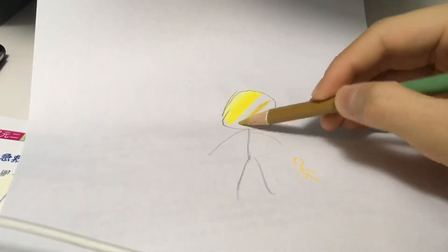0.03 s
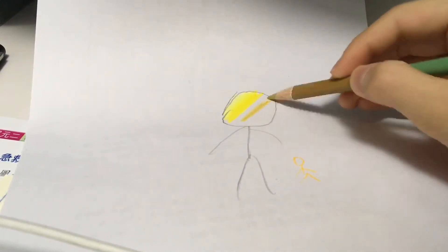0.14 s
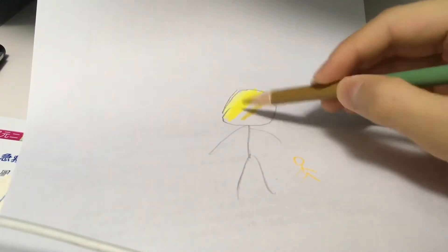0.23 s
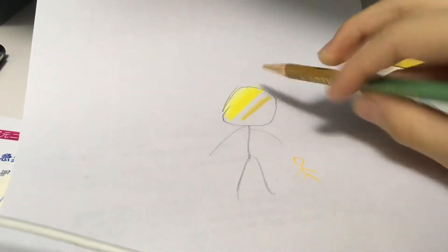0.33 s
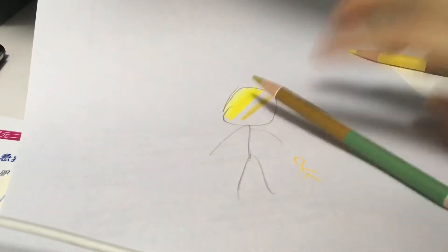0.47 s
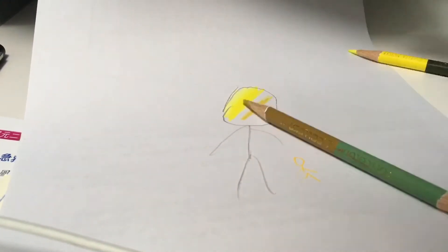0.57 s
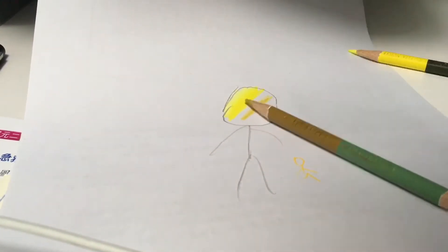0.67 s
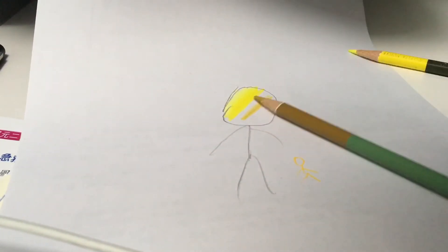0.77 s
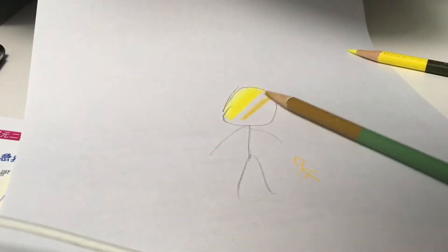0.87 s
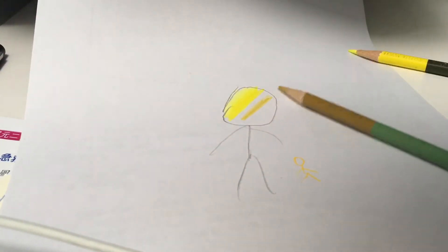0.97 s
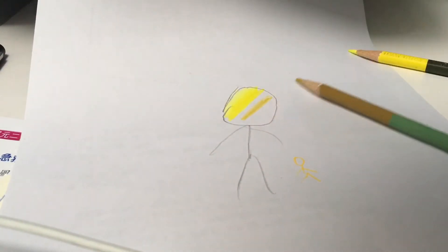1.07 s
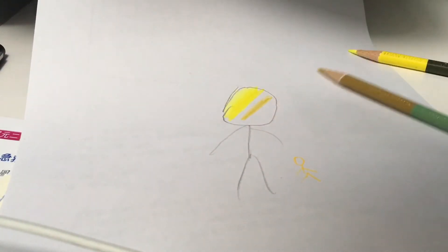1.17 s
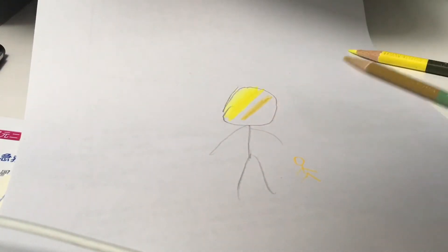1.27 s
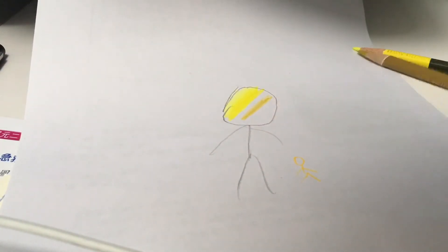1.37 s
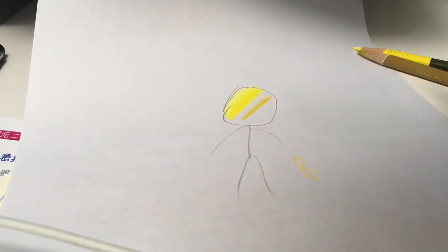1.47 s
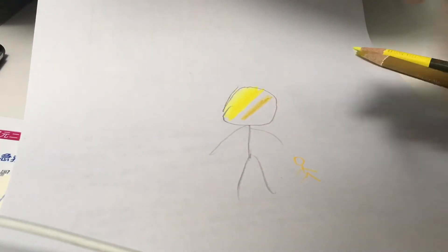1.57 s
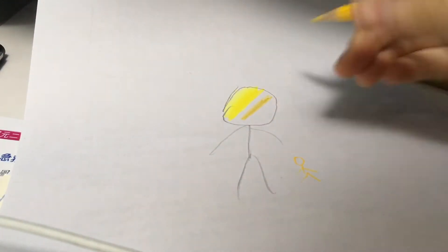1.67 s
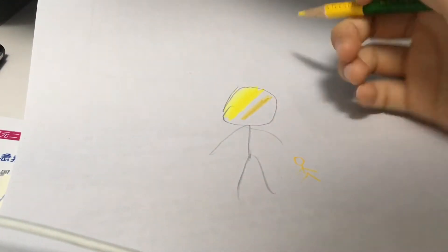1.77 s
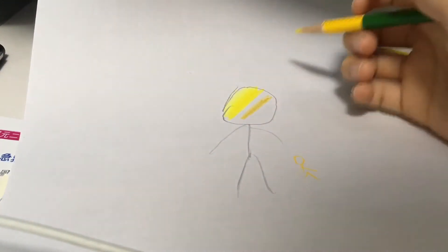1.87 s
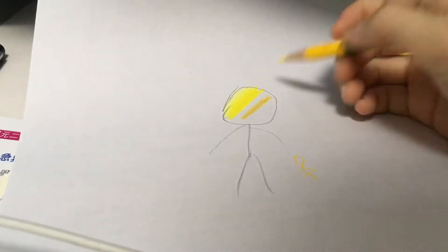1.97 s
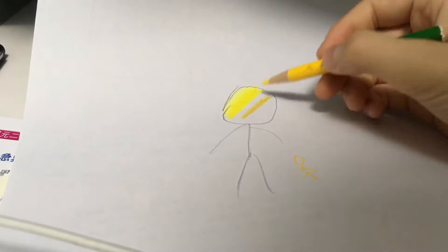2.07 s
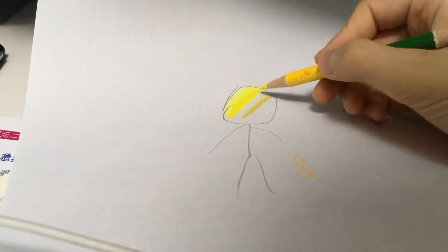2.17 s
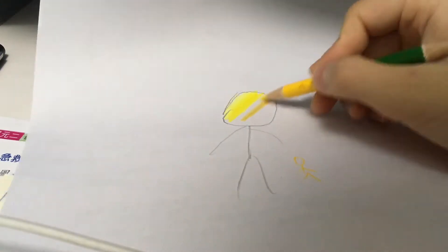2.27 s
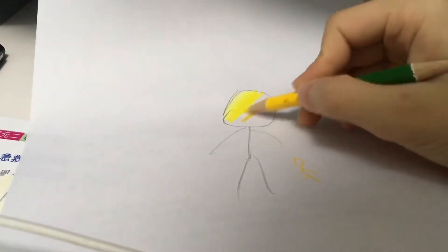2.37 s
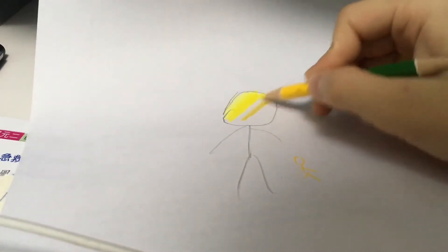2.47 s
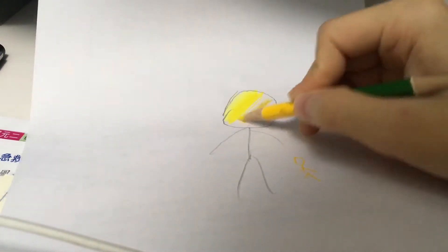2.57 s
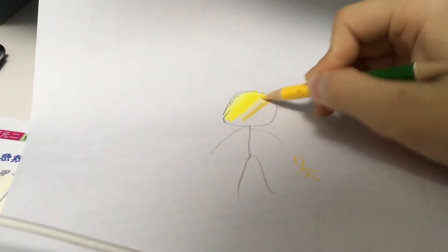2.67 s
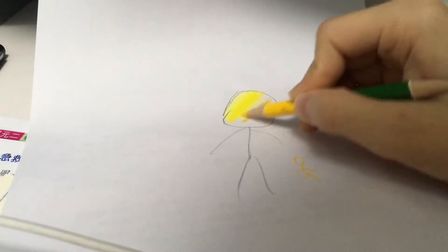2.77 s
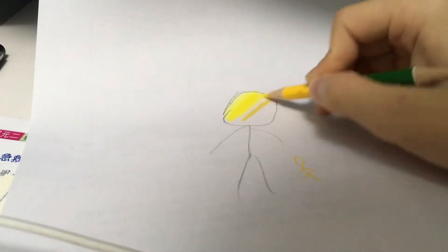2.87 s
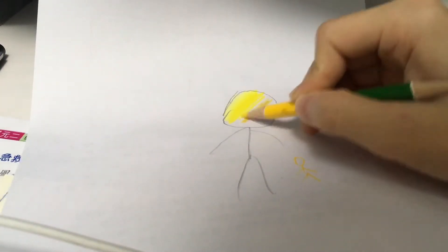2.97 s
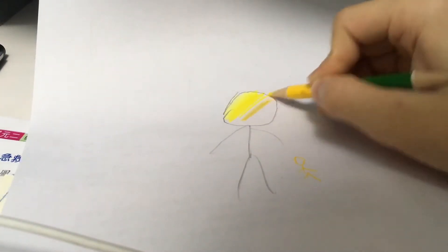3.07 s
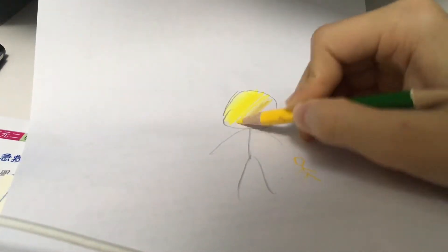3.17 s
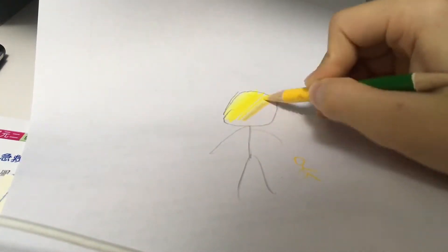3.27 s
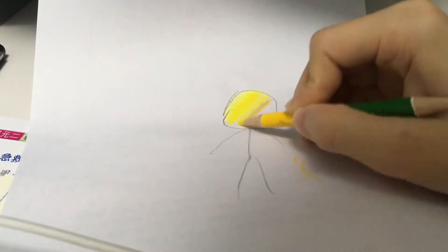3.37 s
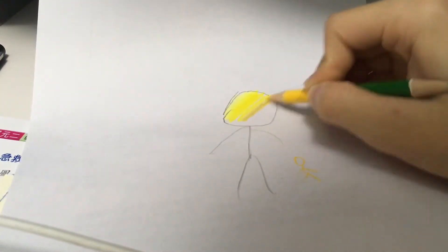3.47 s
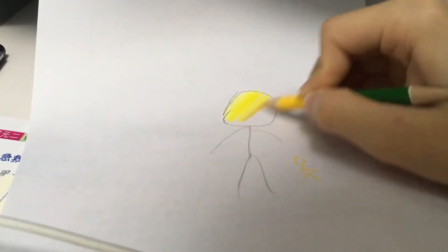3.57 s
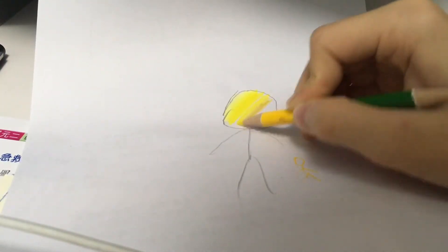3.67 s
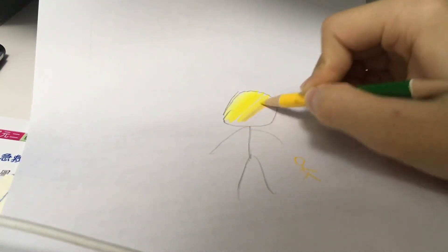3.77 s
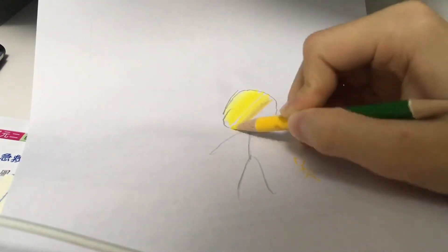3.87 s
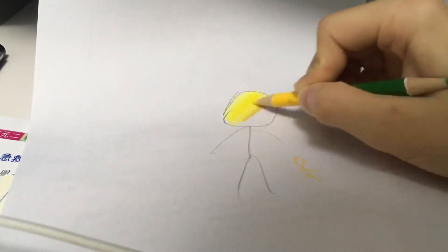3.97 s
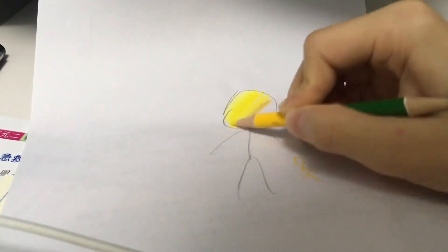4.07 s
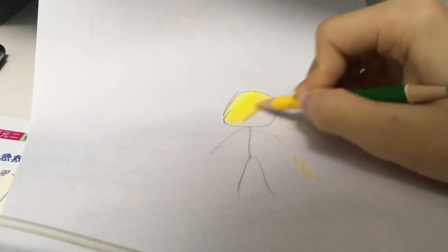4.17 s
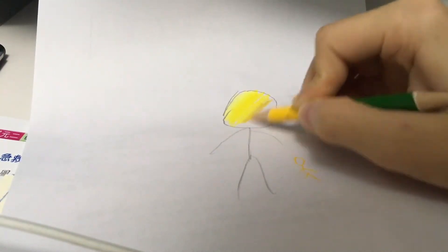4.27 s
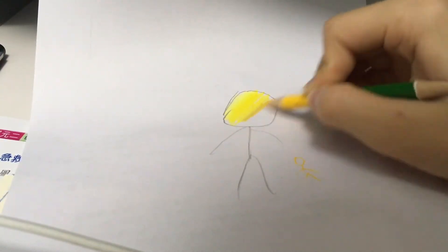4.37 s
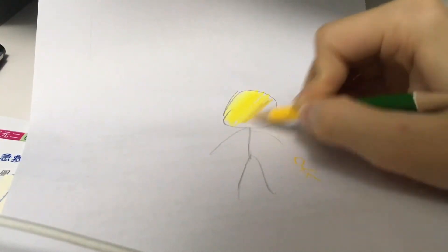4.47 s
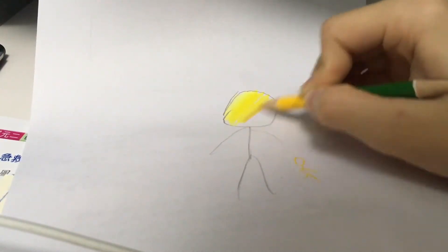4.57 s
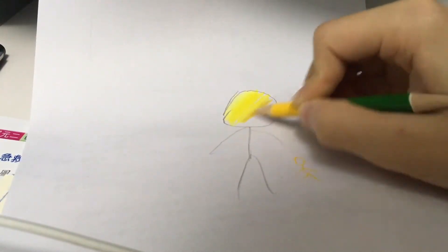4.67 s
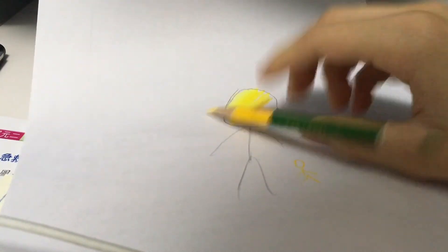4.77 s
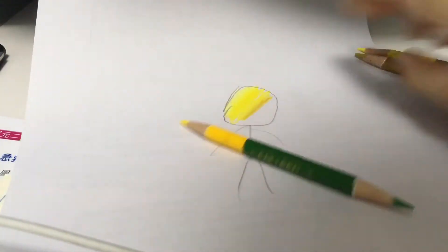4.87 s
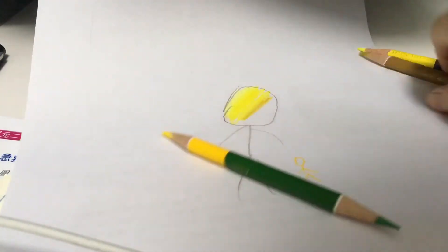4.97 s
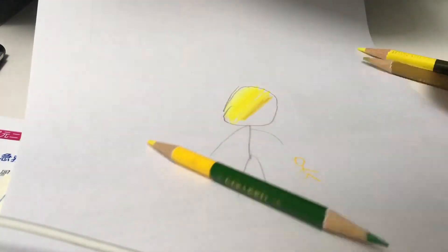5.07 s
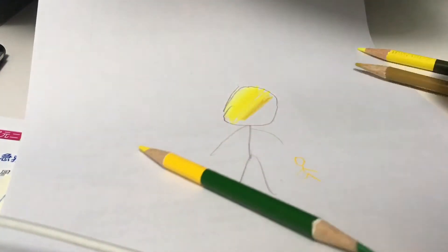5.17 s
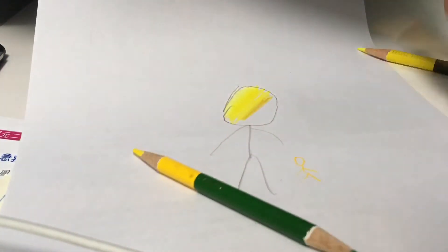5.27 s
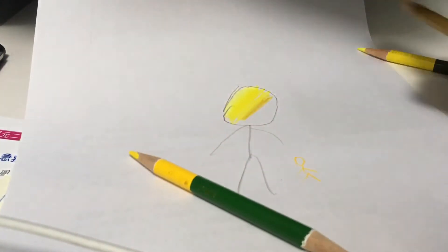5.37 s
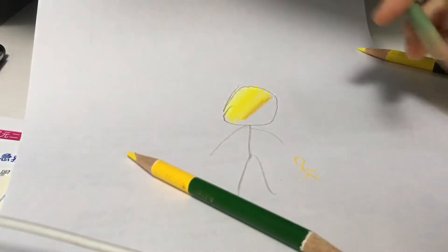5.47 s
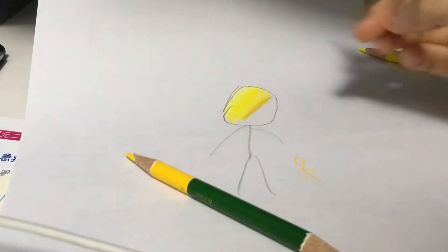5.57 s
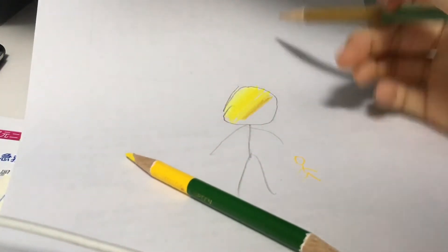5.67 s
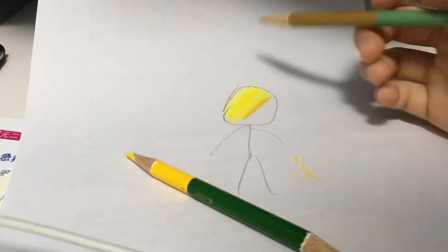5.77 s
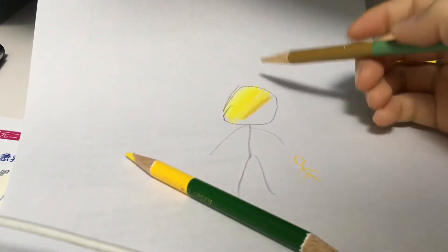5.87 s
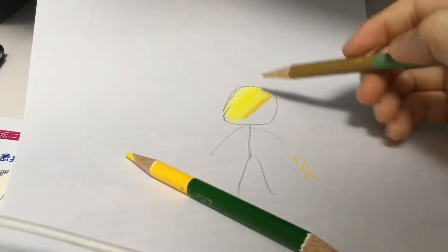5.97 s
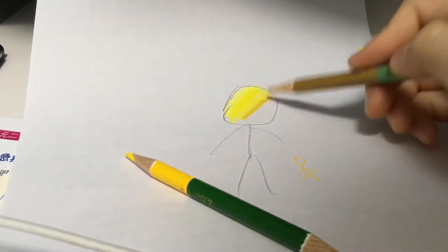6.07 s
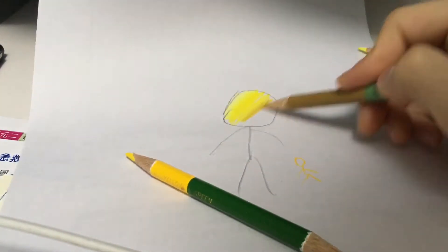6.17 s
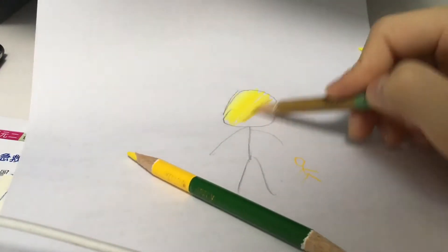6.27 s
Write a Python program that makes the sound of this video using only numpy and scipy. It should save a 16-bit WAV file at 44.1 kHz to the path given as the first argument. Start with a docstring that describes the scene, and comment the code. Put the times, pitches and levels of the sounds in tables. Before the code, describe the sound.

Close to the microphone in a small room, a colored pencil briefly scratches on paper. Pencils then tap, drop onto the desk, clack together and rattle while a hand brushes the sheet. Quick back-and-forth shading follows for a couple of seconds. Another pencil drops and rattles, there is soft rustling, and the shading starts again at the very end. A low ventilation hum runs underneath.

```python
"""A desk in a small room, a phone's microphone close to a sheet of paper, a low ventilation hum behind.
A coloured pencil ends a spell of shading and a hand brushes the sheet; pencils knock down on the desk,
the loudest drop in a short rasp of noise, then clack together and rattle. From 2.25 s the lead shades
back and forth, catching on the paper's tooth in quick strokes. At 4.8 s come more taps, a drop, rattling
and brushing, then one soft scuff. The shading starts again just after 6 s."""
import sys
import numpy as np
from scipy import signal
from scipy.fft import rfft, irfft
from scipy.io import wavfile
from scipy.ndimage import uniform_filter1d

SR = 44100
rng = np.random.default_rng(int(sys.argv[2]) if len(sys.argv) > 2 else 0)


def unload_audio(sound):
    """Save the sound as a 16-bit wav file, at the path given as the first command line argument."""
    columns = np.transpose(np.atleast_2d(sound))
    # keep every value between -1 and 1, then stretch to whole-number steps
    steps = np.round(np.clip(columns, -1, 1) * 32767)
    wavfile.write(sys.argv[1], SR, steps.astype(np.int16))


N = 278922
TIME = np.arange(N) / SR

# room tone, the spectra of ventilation and air: (frequency [Hz], relative level [dB])
HUM_SPECTRUM = [(20, -30.5), (38, -36), (52, -6), (85, -9), (102, -2.5), (165, 0), (215, -2), (234, -10),
                (285, -3), (305, -20.5), (450, -27), (800, -41.5), (2000, -61.5)]
AIR_SPECTRUM = [(200, -2), (500, 4.5), (950, 5.5), (1300, 7), (2250, -0.5), (2600, -2.5), (3300, -4.5),
                (6500, -9), (9000, -6.5), (12000, -12), (15500, -29)]

# the row at 0.742 s is a short rasp of noise around the loud drop; in the others, hand and pencil
# brush over the sheet: (start [s], end [s], rasp [dB], hiss [dB])
RUSTLES = [(.255, .36, -67, -70), (.355, .44, -64.5, -58.5), (.56, .76, -85, -76.5), (.742, .785, -55, -68),
           (.978, 1.034, -53, -64), (1.05, 1.11, -59, -66), (1.115, 1.165, -60.5, -71),
           (1.44, 1.72, -86, -80.5), (1.77, 1.85, -69.5, -70.5), (1.85, 1.96, -72.5, -67.5),
           (4.79, 4.858, -61, -64.5), (4.95, 5.015, -52.5, -68.5), (5.055, 5.135, -55, -75),
           (5.215, 5.245, -71, -80), (5.48, 5.64, -93.5, -78.5), (5.635, 5.667, -61.5, -64.5),
           (5.68, 5.75, -64.5, -68), (5.73, 5.9, -73, -72)]
# a pencil rattles as it rolls and settles: (start [s], end [s], level [dB])
ROLLS = [(1.214, 1.304, -48.5), (1.308, 1.444, -51), (4.929, 4.978, -50.5), (4.962, 4.995, -51),
         (5.055, 5.193, -65.5)]

# modes of a wooden pencil lying on the desk: (frequency [Hz], relative level [dB], t60 [s])
PENCIL_MODES = [(245.3, 0.5, 0.14), (418, -7.5, 0.09), (506, -0.5, 0.039), (715, -5, 0.076),
                (1024, -4, 0.04), (1132, -4, 0.036), (1353, 2, 0.021), (1673, -1.5, 0.044),
                (1779, -7, 0.055), (1963, -2.5, 0.057), (2136, -2.5, 0.037), (2413, -0.5, 0.037),
                (2875, -9, 0.032), (3190, -9.5, 0.042), (3930, -13, 0.031), (4410, -10, 0.04),
                (5060, -14, 0.024), (5690, -10.5, 0.039), (6720, -11.5, 0.026), (7990, -6, 0.025),
                (9500, -18.5, 0.022)]
# blows: (time [s], level [dB], brightness [dB/octave], pitch [ratio], strike point [wavelengths])
BARREL_DROPS = [(0.008, -47, 0, 1.07, 0.56), (0.602, -47.5, -7.5, 0.89, 1.07), (0.757, -33, 2, 1.027, 1.06),
                (0.898, -34, -0.56, 1.003, 1.02), (1.07, -43, -1.5, 0.98, 0.94),
                (4.9165, -35, 1.84, 0.95, 0.87)]  # on the desk
PENCIL_CLACKS = [(1.158, -37.5, -0.21, 0.99, 1.9), (1.218, -32.5, 0.87, 0.99, 1.04),
                 (1.268, -53, -2.4, 1.07, 0.63), (1.286, -45.5, -2.1, 1.04, 0.78),
                 (1.303, -54, -4.2, 0.86, 0.45), (1.324, -43.5, -0.37, 1, 0.22),
                 (1.335, -50, 2.5, 1.1, 0.68)]  # against another pencil
TIP_TAPS = [(0.16, -59.5, -1.5, 0.93, 0.31), (0.382, -61.5, -2, 0.82, 0.44), (0.408, -59, 2, 1, 0.5),
            (0.428, -37.5, 0.6, 1.064, 0.43), (0.517, -48, -3, 0.89, 0.4), (0.527, -54.5, 1.5, 0.95, 0.76),
            (2.22, -58.5, -1.5, 0.98, 0.35), (4.781, -40.5, 1.9, 1.02, 0.762),
            (5.069, -48.5, 0.5, 1.1, 1.03), (5.397, -80, 6, 1.02, 0.45), (6.077, -61.5, 0.5, 1, 0.38)]  # on the sheet
# registers of a blow, from thud to tick: (low edge [Hz], high edge [Hz])
REGISTERS = [(120, 370), (370, 880), (950, 3300), (3500, 11500)]
# offsets to the level for each kind of blow: (thud [dB], knock [dB], clack [dB], tick [dB])
DROP_BALANCE = [0.5, -5, -15, -28]
CLACK_BALANCE = [-16, -13, 0, -16.5]
TAP_BALANCE = [-2.5, -8.5, 0.5, -6]

# the rubbed sheet, heard close up: (frequency [Hz], relative level [dB])
PAPER_SPECTRUM = [(100, -15), (250, 12.5), (320, 6.5), (600, -7.5), (820, 0), (1200, -6.5), (1800, -5),
                  (2400, -11.5), (2700, -8), (3100, -12), (3900, -19.5), (9000, -15.5), (13000, -18.5),
                  (16000, -27.5)]
# resonances and notches of lead, sheet and desk: (frequency [Hz], width [Hz], lift [dB])
PAPER_RESONANCES = [(1730, 260, 3.5), (2322, 150, 12.5), (2666, 120, -23), (3230, 230, 4.5), (4740, 530, 5),
                    (5750, 450, -6.5), (6400, 440, 8.5), (7500, 290, -2), (7720, 390, 4.5), (9470, 650, 1),
                    (11500, 710, 5)]
# spells of shading: (start [s], end [s])
SHADING_SPELLS = [(-0.055, 0.153), (2.252, 4.706), (6.109, 6.325)]
# pace of the wrist: (time [s], tempo [strokes/s])
WRIST_TEMPO = [(0, 9.7), (2.25, 9.475), (2.85, 9.92), (3.65, 8.566), (4.2, 9.433), (4.45, 10.056),
               (4.7, 8.79), (6.1, 9.25)]
# weight of the hand on the lead: (time [s], relative level [dB])
HAND_WEIGHT = [(0.1, 0.1), (2.3, 0), (2.41, -1), (2.51, 0.6), (2.75, -2), (3.1, 0.9), (3.88, -2),
               (4.02, -2), (4.13, -5), (4.24, -5.5), (4.34, 0.5), (4.54, 0.5), (4.65, -2), (6.2, -0.5)]
# extra sheen on the lead's fine hiss: (time [s], relative level [dB])
HISS_SHEEN = [(0.05, -2.5), (2.3, 0), (2.41, -3.5), (2.53, 1.6), (3.0, -1.1), (3.13, 1.2), (3.6, -0.9),
              (4.15, 2), (4.5, -1), (6.2, -2.5)]
# short separate flicks of the lead: (start [s], end [s], rasp gain [dB], hiss gain [dB])
LEAD_FLICKS = [(0.153, 0.212, -61, -64.5), (4.699, 4.759, -52.5, -54.5), (4.744, 4.796, -52.5, -51.5)]


def undb(db):
    """Decibels to gain."""
    return 10 ** (np.asarray(db) / 20)


def unit(x):
    """Scale to rms 1."""
    return x / np.sqrt(np.mean(x ** 2) + 1e-20)


def decay(t, t60):
    """Fall by 60 dB in t60 seconds."""
    return np.exp(-np.log(1000) * t / t60)


def band(x, lo_hz, hi_hz, order=3):
    """Causal band-pass."""
    sos = signal.butter(order, [lo_hz, min(hi_hz, SR / 2 - 1)], "band", fs=SR, output="sos")
    return signal.sosfilt(sos, x)


def colour(x, spectrum, resonances=()):
    """Filter by a smooth spectrum (frequency [Hz], level [dB]) with resonances on it; rms 1."""
    f = np.fft.rfftfreq(len(x), 1 / SR) + 1
    hz, db = np.transpose(spectrum)
    curve_db = np.interp(np.log(f), np.log(hz), db)
    for centre, width, lift in resonances:
        curve_db += lift / (1 + (2 * (f - centre) / width) ** 2)
    return unit(irfft(rfft(x) * undb(curve_db), len(x)))


def wander(rate):
    """Smooth random drift through rate values a second; rms 1."""
    hold = max(int(SR / rate), 2)
    steps = np.repeat(rng.standard_normal(N // hold + 1), hold)
    return unit(uniform_filter1d(steps, hold)[:N])


def ventilation():
    """The bed of the room: a steady low rumble with a few weak tones, under faint air hiss."""
    hum = undb(-50) * colour(rng.standard_normal(N), HUM_SPECTRUM)
    for hz, db in [(86, -66.5), (133, -61.5), (172, -63), (205, -60.5)]:
        drifting_hz = hz + .5 * wander(rate=2.82)
        hum += undb(db) * np.sin(2 * np.pi * np.cumsum(drifting_hz) / SR)
    return hum + undb(-74.5) * colour(rng.standard_normal(N), AIR_SPECTRUM)


def room(x, wet_db=-21, t60=0.24):
    """The small furnished room leaves a short, dull tail well below the close, direct sound."""
    t = TIME[:SR // 2]
    tail = band(rng.standard_normal(len(t)), 810, 6500, order=1) * decay(t, t60) * (t > .004)
    return x + undb(wet_db) * signal.fftconvolve(x, tail / np.linalg.norm(tail))[:N]


def catches(rate, spread_db):
    """Random tiny slips of uneven size, rate per second."""
    slips = (rng.random(N) < rate / SR) * rng.standard_normal(N)
    return unit(slips * undb(spread_db * rng.standard_normal(N)))


def sheet(x, t60, ring_db):
    """The sheet's many close modes let each slip ring on for a moment."""
    t = TIME[:SR // 10]
    ring = rng.standard_normal(len(t)) * decay(t, t60)
    return x + undb(ring_db) * signal.fftconvolve(x, ring / np.linalg.norm(ring))[:N]


def roam(x, depth_db, rate, regions):
    """As the contact moves over the sheet, each region of the spectrum swells and fades on its own."""
    log_hz = np.log(np.fft.rfftfreq(N, 1 / SR) + 1)
    place = np.interp(log_hz, np.log([400, 8000]), [0, regions - 1])
    spectrum = rfft(x)
    parts = (irfft(spectrum * np.maximum(1 - abs(place - k), 0), N) for k in range(regions))
    return sum(undb(depth_db * wander(rate)) * part for part in parts)


def sweep(start, end, power, lean=1, ease_s=0.0188):
    """Loudness of one movement: speed rises from rest and returns to it, peaking early if lean < 1."""
    inside = (TIME > start) & (TIME < end)
    progress = (TIME[inside] - start) / (end - start)
    loudness = np.zeros(N)
    loudness[inside] = unit(np.sin(np.pi * progress ** lean) ** power)
    return uniform_filter1d(loudness, max(int(ease_s * SR), 1))


def rub(moves, rasp, hiss, rasp_power, hiss_power, lean, ease_s):
    """A coarse rasp and a fine hiss follow the speed of each movement."""
    out = np.zeros(N)
    for start, end, rasp_db, hiss_db in moves:
        # grip and angle vary from one movement to the next and shift the lower resonances a little
        shift = 1 + .03 * rng.standard_normal()
        shifted_rasp = np.interp(start + (TIME - start) * shift, TIME, rasp)
        out += undb(rasp_db) * sweep(start, end, rasp_power, lean, ease_s) * shifted_rasp
        out += undb(hiss_db) * sweep(start, end, hiss_power, lean, ease_s) * hiss
    return out


def scuff():
    """One soft, hollow scuff."""
    spectrum = [(150, -20), (350, 3.5), (620, 7), (800, -20), (960, 2), (1150, -27), (3000, -60)]
    return undb(-56.5) * colour(rng.standard_normal(N), spectrum) * sweep(5.745, 5.84, power=1.1)


def skids(length_s=0.049, rasp_offset_db=-10, hiss_offset_db=-29):
    """After each tap the tip slides a little, the louder the harder it landed."""
    return [(at, at + length_s, db + rasp_offset_db, db + hiss_offset_db) for at, db, *_ in TIP_TAPS]


def rustling():
    """Skin and wood slide and stick on the sheet; also, a short rasp of noise surrounds the loud drop."""
    spectrum = [(200, 17.5), (600, 5), (1200, 3), (2200, 2.5), (2700, -6.5), (3300, -4),
                (4500, -6), (6000, -4.5), (9500, -2.5), (12500, -12), (16000, -19)]
    flicker = undb(2 * wander(rate=130))
    slips = flicker * sheet(catches(rate=5000, spread_db=2), t60=0.072, ring_db=-7.5)
    grain = roam(colour(slips, spectrum), depth_db=3, rate=40, regions=18)
    rasp = unit(band(grain, 240, 3780))
    hiss = unit(band(grain, 2200, SR / 2))
    return rub(RUSTLES + skids(), rasp, hiss, rasp_power=0.65, hiss_power=0.37, lean=0.7, ease_s=0.02)


def rolling():
    """A barrel chatters on the desk in many tiny contacts, its ring changing as it turns."""
    spectrum = [(150, -17), (260, 15.5), (450, -2), (650, -7.5), (1100, 4), (1500, -0.5),
                (2000, 0.5), (2800, -4.5), (4200, -15.5), (6000, -22.5), (10000, -32), (16000, -61)]
    contacts = sheet(catches(rate=700, spread_db=2.5), t60=0.072, ring_db=-1.5)
    chatter = roam(colour(contacts, spectrum), depth_db=3, rate=40, regions=18)
    return chatter * sum(undb(db) * sweep(start, end, power=0.71, lean=0.31) for start, end, db in ROLLS)


def blow(pitch, point, contact_s):
    """One blow rings the pencil's modes, cracks, and shakes the sheet."""
    t = TIME[:SR // 4]
    hz, mode_db, t60 = np.transpose(PENCIL_MODES)[:, :, None]
    sign = (-1) ** np.arange(len(hz))[:, None]
    # point is in wavelengths of the lowest mode; bending waves shorten with the root of frequency
    strike_db = 4 * np.cos(2 * np.pi * point * np.sqrt(hz / hz[0]))
    gain = sign * undb(mode_db + strike_db)  # a mode struck near its node stays weak
    # the pencil rests differently at each blow, which shifts its higher modes most
    detune = .03 * np.minimum(hz / 8000, 1) * rng.standard_normal(hz.shape)
    tuned_hz = hz * pitch * (1 + detune)
    ring = np.sum(gain * decay(t, t60) * np.sin(2 * np.pi * tuned_hz * t), axis=0)
    crack = undb(4) * decay(t, t60=0.011)
    flutter = undb(-10) * decay(t, t60=0.092)
    attack = 1 - np.exp(-t / contact_s)
    return (ring + (crack + flutter) * rng.standard_normal(len(t))) * attack


def hits(blows, balance_db, contact_s, rebound_s, rebound_db):
    """Blows of one kind, each with a weaker rebound; brightness tilts the registers about the strongest."""
    octaves = np.log2(REGISTERS).mean(axis=1)
    octaves -= octaves[np.argmax(balance_db)]
    out = np.zeros(N + SR)
    for start, level_db, brightness, pitch, point in blows:
        for at, force_db in [(start, level_db), (start + rebound_s, level_db + rebound_db)]:
            sound = blow(pitch, point, contact_s)
            onset = int(at * SR)
            for (lo_hz, hi_hz), db in zip(REGISTERS, balance_db + brightness * octaves):
                part = band(sound, lo_hz, hi_hz)
                attack_rms = np.std(part[:SR // 50])
                out[onset:onset + len(part)] += undb(force_db + db) * part / attack_rms
    return out[:N]


def knocks():
    """Pencils drop on the desk, clack together and tap the sheet, close to the microphone."""
    drops = hits(BARREL_DROPS, DROP_BALANCE, contact_s=0.0011, rebound_s=0.0125, rebound_db=-18.5)
    clacks = hits(PENCIL_CLACKS, CLACK_BALANCE, contact_s=0.00087, rebound_s=0.004, rebound_db=-12.5)
    taps = hits(TIP_TAPS, TAP_BALANCE, contact_s=0.00046, rebound_s=0.009, rebound_db=-13)
    return drops + clacks + taps


def strokes(rasp_gain_db=-55.5, hiss_gain_db=-58, moving_share=0.77):
    """The wrist swings at its tempo; between two turns lies one stroke, as loud as the hand is heavy."""
    moves = []
    for start, end in SHADING_SPELLS:
        t = np.arange(start, end, 1 / SR)
        swings = np.cumsum(np.interp(t, *np.transpose(WRIST_TEMPO))) / SR
        turns = np.interp(np.arange(round(swings[-1]) + 1), swings, t)
        for turn, next_turn in zip(turns, turns[1:]):
            middle = (turn + next_turn) / 2
            half = moving_share * (next_turn - turn) / 2  # the lead rests at each turn
            weight_db = np.interp(middle, *np.transpose(HAND_WEIGHT))
            sheen_db = np.interp(middle, *np.transpose(HISS_SHEEN))
            moves.append((middle - half, middle + half,
                          rasp_gain_db + weight_db, hiss_gain_db + weight_db + sheen_db))
    return moves


def shading():
    """Up front, the lead trips over coarse tooth (rasp) and single fibres (hiss) as pressure wavers."""
    tooth = sheet(catches(rate=1500, spread_db=1), t60=0.04, ring_db=-5.5)
    tooth = roam(colour(tooth, PAPER_SPECTRUM, PAPER_RESONANCES), depth_db=2.8, rate=55, regions=22)
    fibres = sheet(catches(rate=12000, spread_db=-2.5), t60=0.016, ring_db=-2.5)
    fibres = roam(colour(fibres, PAPER_SPECTRUM, PAPER_RESONANCES), depth_db=2, rate=12, regions=26)
    pressure_db = wander(rate=50)
    rasp = undb(4.5 + pressure_db) * unit(band(tooth, 199, 3060))
    hiss = undb(.5 * pressure_db) * unit(band(fibres, 3120, SR / 2))
    moves = strokes() + LEAD_FLICKS
    return rub(moves, rasp, hiss, rasp_power=0.81, hiss_power=0.49, lean=0.85, ease_s=0.012)


def scene():
    """The desk close up in mono, with the small room and its ventilation behind."""
    desk = shading() + rustling() + rolling() + scuff() + knocks()
    return (room(desk) + ventilation())[None]


def record(dry, top_hz=15900):
    """The phone beside the sheet cuts the top steeply."""
    return signal.sosfilt(signal.ellip(10, .2, 80, top_hz, fs=SR, output="sos"), dry)


dry = scene()
out = record(dry)
unload_audio(out)
```